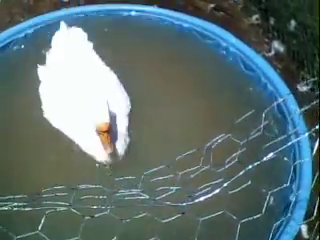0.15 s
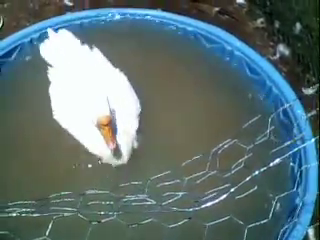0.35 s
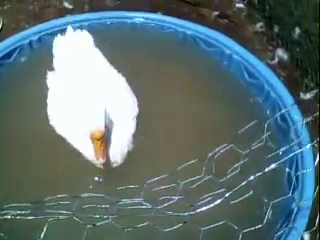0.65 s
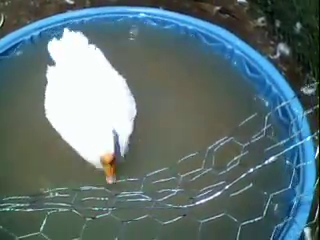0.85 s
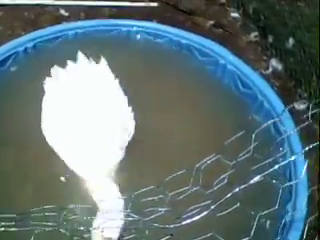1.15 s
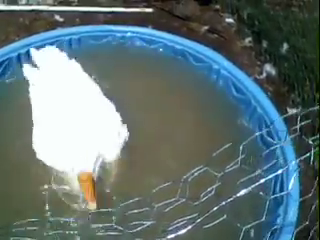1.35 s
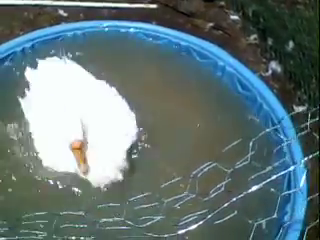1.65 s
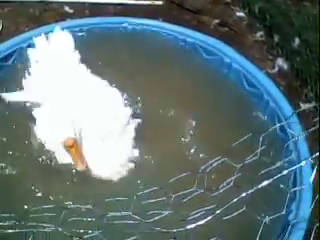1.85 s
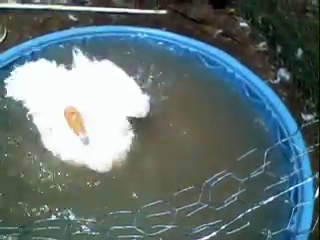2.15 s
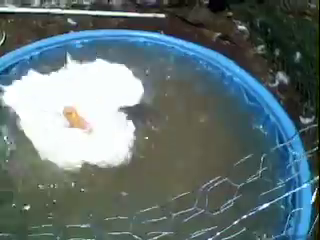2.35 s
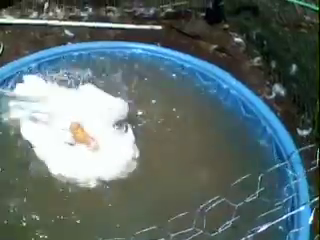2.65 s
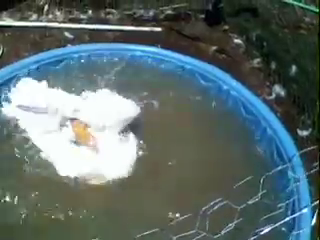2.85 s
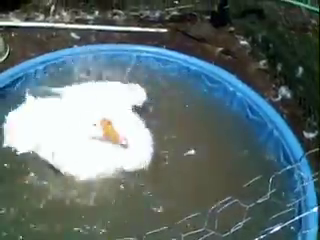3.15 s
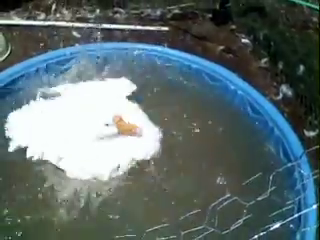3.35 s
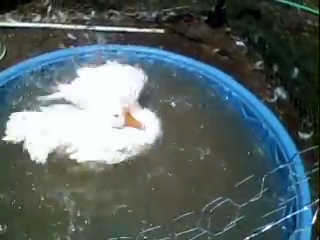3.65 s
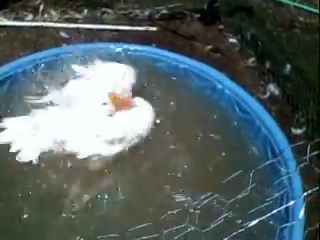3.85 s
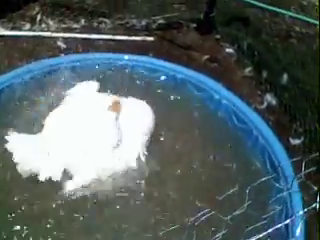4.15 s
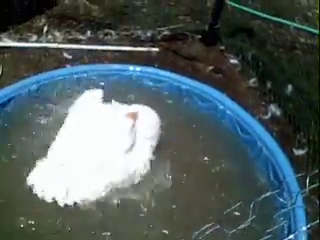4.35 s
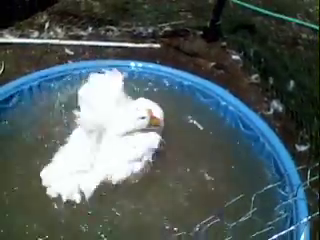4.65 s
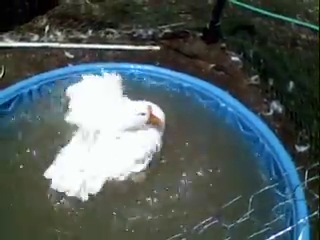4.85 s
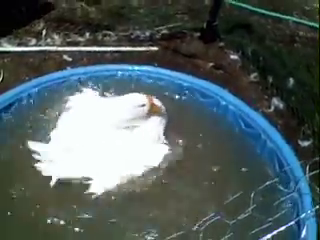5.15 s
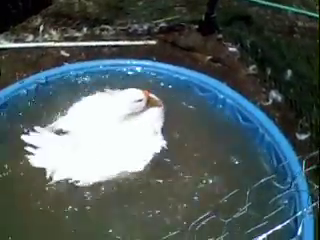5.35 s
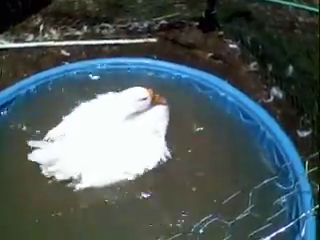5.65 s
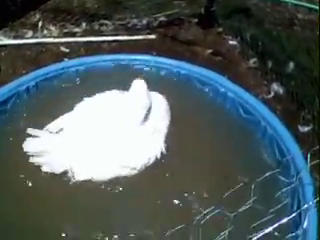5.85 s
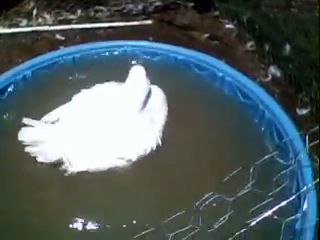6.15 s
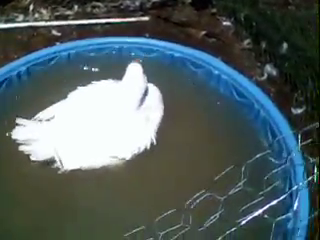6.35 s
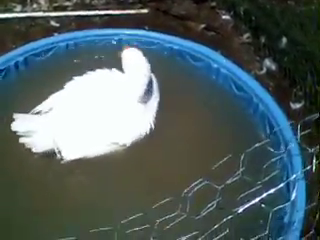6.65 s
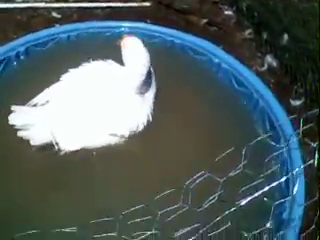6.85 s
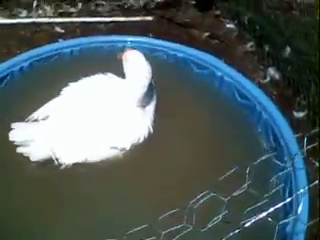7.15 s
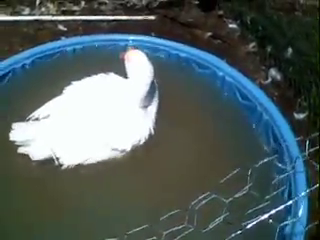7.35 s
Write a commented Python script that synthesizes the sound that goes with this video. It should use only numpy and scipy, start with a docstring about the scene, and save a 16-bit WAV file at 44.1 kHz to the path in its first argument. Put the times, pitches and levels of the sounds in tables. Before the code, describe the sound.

Wind buffets the microphone while a bathing goose churns water in rhythmic splashes, with gloops, spray and drips.

```python
"""First you hear gusts rumbling on a small camera's microphone, over a soft breeze, hiss and a thin whine.
A goose rasps its bill along wire netting and knocks the wall of a shallow plastic pool. Then it rolls
and beats its wings in the water: slaps, spray, falling drops and churning, made mostly of tiny ringing
bubbles. Bigger pockets of trapped air gloop upward in pitch. The camera's case colours the splashes."""
import sys
import numpy as np
from scipy import signal
from scipy.fft import rfft, irfft
from scipy.io import wavfile
from scipy.ndimage import map_coordinates

SR = 44100
rng = np.random.default_rng(int(sys.argv[2]) if len(sys.argv) > 2 else 0)


def file_out(sig):
    """Save sig as 16-bit WAV at sys.argv[1]."""
    # one column per channel
    cols = np.atleast_2d(sig).T
    # limit, then scale
    lim = np.clip(cols, -1, 1)
    pcm = np.round(lim * 32767).astype(np.int16)
    wavfile.write(sys.argv[1], SR, pcm)


N = 331014
TIME = np.arange(N) / SR


def amp(db):
    """Turn decibels into a number to multiply by."""
    return 10 ** (np.asarray(db) / 20)


def unit(x):
    """Scale a signal so that its average power is 1."""
    return x / np.sqrt(np.mean(x ** 2) + 1e-20)


def level_curve(rows, outside_db=None):
    """Join (t/s, level/dB) points into a volume curve."""
    times, db = np.transpose(rows)
    return amp(np.interp(TIME, times, db, outside_db, outside_db))


def swell(t, rise_s, fall_s):
    """A shape that grows to 1 at t = 0, then dies away."""
    return np.exp(np.minimum(t / rise_s, -t / fall_s))


def wander(per_s):
    """A smooth random wiggle, about 1 in size, that changes per_s times a second."""
    points = rng.standard_normal(4000)
    return unit(map_coordinates(points, [TIME * per_s], order=2, mode="wrap"))


def colour(x, tone):
    """Shape the lows and highs by (f/Hz, level/dB) points, falling 18 dB an octave above the last."""
    size = 16384
    hz, db = np.transpose(tone)
    grid = np.maximum(np.fft.rfftfreq(size, 1 / SR), 1)
    level = np.interp(np.log(grid), np.log(hz), db) - 18 * np.maximum(np.log2(grid / hz[-1]), 0)
    # build the filter so that it never rings ahead of a sound (minimum phase)
    cepstrum = irfft(np.log(amp(level)))[:size // 2]
    cepstrum[1:] *= 2
    response = irfft(np.exp(rfft(cepstrum, size)))
    return signal.fftconvolve(x, response)[:N]


def noise(tone):
    """A steady rushing sound with the given lows and highs."""
    return unit(colour(rng.standard_normal(N), tone))


def ring(clicks, hz, ring_s):
    """Each click starts a note that fades by 60 dB in ring_s."""
    keep, turn = amp(-60 / (ring_s * SR)), 2 * np.pi * hz / SR
    return signal.lfilter([0, np.sin(turn)], [1, -2 * keep * np.cos(turn), keep * keep], clicks + 1e-18)


def add(track, s, sound):
    """Mix a sound into a track, starting at s seconds."""
    i = max(int(s * SR), 0)
    track[i:i + len(sound)] += sound[:N - i]


def pool_echo(x, ring_s, echo_db):
    """Sound bounces off the pool wall and the ground and follows close behind."""
    t = TIME[:SR // 6]
    tail = rng.standard_normal(len(t)) * amp(-60 * t / ring_s) * (t > .002)
    return x + amp(echo_db) * signal.fftconvolve(x, tail / np.linalg.norm(tail))[:N]


# pitches that the camera's case boosts or dulls: f/Hz, width/Hz, gain/dB
CASE_BANDS = [(893, 290, 8.5), (1157, 57, -5.5), (1326, 170, 8), (1660, 220, -9), (1910, 720, 19.5),
              (2610, 268, -19), (3004, 220, 5.5), (3900, 1080, 13), (5527, 540, 9), (7830, 660, -10),
              (9200, 1040, 12.5)]

def camera_case(x):
    """The small hollow in front of the microphone makes some pitches louder and others softer."""
    for hz, width, db in CASE_BANDS:
        turn, gain = 2 * np.pi * hz / SR, amp(db / 2)
        band, middle = np.sin(turn) * width / (2 * hz), -2 * np.cos(turn)
        top = [1 + band * gain, middle, 1 - band * gain]
        bottom = [1 + band / gain, middle, 1 - band / gain]
        x = signal.lfilter(top, bottom, x)
    return x


# how the far-off breeze rises and falls: t/s, level/dB
BREEZE_LEVELS = [(0, -55.5), (.5, -67), (5.6, -65.5), (7.5, -72)]
# tone of the breeze and of the hiss: f/Hz, level/dB
BREEZE_TONE = [(150, 4.5), (850, 2), (1400, -7.5)]
HISS_TONE = [(100, -3), (1300, 3), (3000, 1.5), (9500, 2), (11500, -11.5)]
# notes in the whine: f/Hz, level/dB
WHINE_NOTES = [(4199, -92), (5599, -83.5), (6202, -104), (7400, -83), (10524, -91)]

def background(hiss_db=-72.5, waver=0.53):
    """A soft breeze blows further off, while the camera's electronics hiss and whine."""
    breeze = level_curve(BREEZE_LEVELS) * noise(BREEZE_TONE)
    whine = sum(amp(db) * np.sqrt(2) * np.sin(2 * np.pi * hz * TIME + waver * wander(39))
                for hz, db in WHINE_NOTES)
    return breeze + amp(hiss_db) * noise(HISS_TONE) + whine


# strength of the wind on the microphone: t/s, level/dB
WIND_LEVELS = [(0.0, -54), (0.3, -48), (0.5, -43), (0.74, -52), (0.9, -38.5), (1.28, -56.5), (1.4, -55.5),
               (1.99, -54.5), (2.3, -48.5), (2.75, -49.5), (3.32, -54.5), (3.51, -42.5), (3.75, -41.5),
               (4.18, -52.5), (4.65, -54), (4.88, -49), (5.05, -52.5), (5.54, -54), (5.9, -47.5),
               (6.21, -40), (6.45, -47), (6.7, -45.5), (7.51, -60)]
# tone of the big and the small swirls of air: f/Hz, level/dB
RUMBLE_TONE = [(5, 1.5), (14, 9.5), (30, -5.5), (50, -10), (80, -22.5), (250, -69)]
FLUTTER_TONE = [(25, -14), (60, 3.5), (90, -2.5), (130, -8.5), (300, -20.5), (550, -33.5), (900, -39)]

def wind(rumble_db=0.5, flutter_db=3.0, gustiness_db=1.0, swirl_db=4.0):
    """Big swirls of air rumble on the microphone; small ones flutter at its opening as gusts grow."""
    gust = level_curve(WIND_LEVELS) * amp(gustiness_db * wander(per_s=15))
    rumble = noise(RUMBLE_TONE)
    flutter = unit(noise(FLUTTER_TONE) * amp(swirl_db * wander(per_s=45)))
    return amp(rumble_db) * gust ** 0.65 * rumble + amp(flutter_db) * gust * flutter


# sudden puffs of air: t/s, push level/dB, swirl level/dB, swirl fade/s
AIR_PUFFS = [(0.436, -21, -67, 0.08), (0.87, -22, -44, 0.13), (1.182, -23, -41, 0.022),
             (2.312, -17.5, -40.5, 0.035), (3.131, -33, -38.5, 0.089), (3.5, -23.5, -46, 0.14),
             (5.215, -17, -43, 0.082), (5.677, -51, -45, 0.033), (6.226, -25, -35, 0.046),
             (6.701, -31, -47.5, 0.04), (7.21, -32, -43.5, 0.026)]
# tone of the swirling air behind a puff: f/Hz, level/dB
SWIRL_TONE = [(40, 2.5), (110, 15), (300, -2), (700, -11.5), (1500, -41)]

def puffs(push_s=0.0079, rise_s=0.012):
    """A puff gives the microphone one push and trails swirling air behind it."""
    pushes, swirls = 0, 0
    for s, push_db, swirl_db, fade_s in AIR_PUFFS:
        t = TIME - s
        pushes += amp(push_db) * np.exp(-(t / push_s) ** 2)
        swirls += amp(swirl_db) * swell(t, rise_s, fade_s)
    return pushes + swirls * noise(SWIRL_TONE)


# faint dry ticks before and after the bath: t/s, level/dB
DRY_TICKS = [(0.135, -49), (.529, -39.5), (5.753, -46), (6.126, -46), (6.415, -49)]

def ticks(fade_s=0.00025):
    """Each tick is one sharp jump in air pressure that leaks away at once."""
    out = np.zeros(N)
    for s, db in DRY_TICKS:
        add(out, s, amp(db) * np.exp(-TIME[:SR // 100] / fade_s))
    return out


# the biggest falling drops: t/s, f/Hz, level/dB
BIG_DROPS = [(.256, 5950, -55.5), (1.322, 6700, -55), (1.482, 6660, -54.5), (1.533, 5770, -57),
             (1.726, 4110, -58), (1.89, 5360, -53.5), (2.746, 5300, -50), (3.165, 5360, -34.5),
             (3.247, 5400, -50), (3.377, 5300, -38), (3.492, 3900, -47), (3.649, 4250, -45.5),
             (3.956, 3860, -54), (4.083, 3890, -54.5), (4.927, 4100, -50.5), (5.193, 3600, -58),
             (5.194, 9200, -55), (5.359, 4060, -57), (5.585, 9370, -48.5)]

def drops(rise_s=0.00039, fade_s=0.00042, tick_share=0.64):
    """A drop ticks on the water and leaves one tiny ringing bubble."""
    out, t = np.zeros(N), TIME[:SR // 25] - TIME[SR // 100]
    for s, hz, db in BIG_DROPS:
        plink = np.sin(2 * np.pi * hz * t) + tick_share * rng.standard_normal(len(t))
        add(out, s + t[0], amp(db) * plink * swell(t, rise_s, fade_s))
    return out


# wings and water landing flat on the pool: t/s, level/dB, fade/s
WATER_SLAPS = [(1.414, -57, 0.0092), (1.689, -50.5, 0.0054), (2.042, -44.5, 0.0057), (2.315, -51, 0.03),
               (2.549, -53.5, 0.009), (3.169, -35.5, 0.0023), (3.378, -34, 0.0053), (3.532, -46.5, 0.05),
               (4.358, -53, 0.02), (4.75, -46.5, 0.0035), (5.179, -51.5, 0.0093)]
# tone of a slap's crackle (also of the bill's scrape) and of its whump: f/Hz, level/dB
CRACKLE_TONE = [(100, 11), (400, 6.5), (1000, -1), (3000, -19), (6000, -13.5), (12000, -32)]
WHUMP_TONE = [(120, -34), (300, 3.5), (550, -2.5), (1200, -42)]

def slaps(rise_s=0.0034, whump_db=-11, whump_s=0.01):
    """A flat blow on water crackles, then gives a dull whump as the dent in the water closes."""
    burst, closing = np.zeros(N), np.zeros(N)
    t = TIME[:SR // 4] - TIME[SR // 50]
    age = np.maximum(t, 0) / whump_s
    for s, db, fade_s in WATER_SLAPS:
        add(burst, s + t[0], amp(db) * swell(t, rise_s, fade_s))
        add(closing, s + t[0], amp(db + whump_db) * age * np.exp(1 - age))
    return burst * noise(CRACKLE_TONE) + closing * noise(WHUMP_TONE)


def bill_pressure(start_s=1.164, hold_s=0.035, rise_s=0.0013, fade_s=0.007, judder_hz=75):
    """The bill bites on the wire, judders and lets go."""
    t = TIME - start_s
    bite = np.clip(t / rise_s, 0, 1)
    judder = 1 + 0.3 * np.sin(2 * np.pi * judder_hz * t)
    release = np.exp(-np.maximum(t - hold_s, 0) / fade_s)
    return bite * judder * release


# notes of the wire netting: f/Hz, level/dB, ring time/s
WIRE_NOTES = [(3000, 2.5, 0.012), (3780, 0, 0.063), (3860, 5, 0.032), (4870, 2, 0.008), (6800, -7, 0.031),
              (9200, -25, .015)]

def bill_rasp(level_db=-49.5, slips_per_s=5000, grit=0.84):
    """The bill slips along the wire in tiny jerks, which keep it ringing over a gritty scrape."""
    slips = rng.standard_normal(N) * (rng.random(N) < slips_per_s / SR)
    wire = unit(sum(amp(db) * ring(slips, hz, ring_s) for hz, db, ring_s in WIRE_NOTES))
    scrape = grit * unit(camera_case(colour(slips, CRACKLE_TONE)))
    return amp(level_db) * (wire + scrape) * bill_pressure()


# knocks of the bill: t/s, level/dB, push time/s (half of the whole touch)
BILL_KNOCKS = [(1.165, -39, 0.00013), (1.201, -28, 0.00028), (1.2262, -35.5, 0.00033)]
# notes of the pool wall: f/Hz, level/dB, ring time/s
WALL_NOTES = [(526, -0.5, 0.035), (790, 1.5, 0.018), (950, -7, 0.023), (1330, -3, 0.034), (1940, 5, 0.0085),
              (1900, -14, 0.059), (3740, -6, .012)]

def bill_knocks():
    """Soft knocks of the bill set the plastic wall thudding."""
    blows = np.zeros(N)
    for s, db, push_s in BILL_KNOCKS:
        push = np.hanning(int(2 * push_s * SR) + 3)
        add(blows, s, amp(db) * push / push.sum())
    wall = sum((-1) ** k * amp(db) * ring(blows, hz, ring_s)  # every other note starts the opposite way
               for k, (hz, db, ring_s) in enumerate(WALL_NOTES))
    return pool_echo(wall, ring_s=0.37, echo_db=-14)


def small_gloops(offset_db=-4.5, spread_db=7.0, low_hz=560, high_hz=1700, fade_s=0.049, climb=11000):
    """Pick 14 small air pockets at random, louder where the bath is livelier; rows as in BIG_GLOOPS."""
    times, effort_db = np.transpose(BATH_EFFORT)
    when, pitch, softness = rng.random((14, 3)).T
    starts = times[0] + (times[-1] - times[0]) * when
    pitches = low_hz * (high_hz / low_hz) ** pitch
    levels = np.interp(starts, times, effort_db) + offset_db - spread_db * (2 * softness - 1)
    return [(s, hz, db, fade_s, climb) for s, hz, db in zip(starts, pitches, levels)]


# the biggest air pockets closing: t/s, starting f/Hz, level/dB, fade/s, climb/(Hz per s)
BIG_GLOOPS = [(1.43, 693, -53, 0.025, 5000), (1.48, 948, -55, 0.023, 7000),
              (1.725, 1950, -58.5, 0.013, 5000), (1.958, 716, -49, 0.033, 17000),
              (2.217, 973, -49, 0.023, 26600), (2.225, 668, -47.5, 0.033, 8900),
              (2.512, 856, -52, 0.014, 8000), (2.635, 745, -47, 0.015, 16100),
              (2.662, 800, -47.5, 0.013, 3000), (2.872, 583, -48, 0.024, 10000),
              (2.937, 860, -50.5, 0.021, 5000), (2.96, 1203, -51.5, 0.019, 18000),
              (3.038, 946, -48.5, 0.021, 7000), (3.119, 472, -45.5, 0.018, 26000),
              (3.275, 1270, -54, 0.022, 6000), (3.311, 438, -38.5, 0.013, 54000),
              (3.967, 642, -40, 0.015, 20100), (4.005, 1230, -51.5, 0.014, 7000),
              (4.324, 865, -53, 0.024, 5000), (4.654, 1900, -53.5, 0.0091, 5000),
              (4.86, 697, -48, 0.029, 16100), (5.093, 417, -48, 0.02, 20100),
              (5.114, 1124, -48, 0.026, 16000), (5.117, 1730, -52.5, 0.014, 8000),
              (5.153, 529, -46.5, 0.038, 30200), (5.273, 818, -49.5, 0.02, 4000),
              (5.291, 472, -46.5, 0.034, 8050)]

def gloops(level_db=-2.5, rise_s=0.00088, fade_db=17, wobble=0.062, roughness=0.49):
    """A trapped pocket of air rings, wobbles and climbs in pitch as it nears the surface."""
    out, t = np.zeros(N), TIME[:SR // 8]
    pitch_wobble = 1 + wobble * wander(per_s=450)
    level_wobble = 1 + roughness * wander(per_s=550)
    for s, start_hz, db, fade_s, climb in list(BIG_GLOOPS) + small_gloops():
        now = int(s * SR) + np.arange(len(t))
        hz = (start_hz + climb * np.minimum(t, 2 * fade_s)) * pitch_wobble[now]
        volume = (1 - np.exp(-t / rise_s)) * amp(db - fade_db * (t / fade_s) ** 2) * level_wobble[now]
        add(out, s, volume * np.sin(2 * np.pi * np.cumsum(hz) / SR))
    return amp(level_db) * out


def bubbles(per_s, low_hz, high_hz, cycles, spread_db, clump_db, pitches=24):
    """Bubbles pop up in clumps and ring briefly at random pitches; more means denser, not louder."""
    size = amp(spread_db * np.minimum(rng.exponential(1, N), 4)) * rng.choice([-1, 1], N)
    born = rng.random(N) < per_s * amp(clump_db * wander(per_s=60)) / SR
    clicks = size / np.sqrt(per_s) * born
    choice = rng.integers(0, pitches, N)
    return sum(ring(clicks * (choice == k), hz, cycles / hz) * np.sqrt(hz / low_hz)
               for k, hz in enumerate(np.geomspace(low_hz, high_hz, pitches)))


# spurts flung off the feathers: t/s, level/dB, fade/s
FEATHER_SPURTS = [(1.42, -59.5, 0.016), (1.535, -56, 0.0054), (1.597, -58, 0.018), (1.655, -62, 0.025),
                  (1.892, -62, 0.0087), (2.635, -60, 0.0077), (2.748, -58, 0.0097), (3.245, -69, .01),
                  (3.975, -54, 0.028), (4.368, -51.5, 0.013)]
# tone of all the spray: f/Hz, level/dB
SPRAY_TONE = [(1200, 7), (2500, 12.5), (3300, 9), (6500, 15.5), (10000, 8.5), (12000, -34)]

def spurts(rise_s=0.004):
    """A flick of the feathers sends a tight shower of droplets onto the water."""
    shower = sum(amp(db) * swell(TIME - s, rise_s, fade_s) for s, db, fade_s in FEATHER_SPURTS)
    patter = bubbles(per_s=3500, low_hz=2670, high_hz=11300, cycles=12, spread_db=3.0, clump_db=-3.0)
    return shower * unit(camera_case(colour(patter, SPRAY_TONE)))


def surges(rows, rise_s=0.008, fall_s=0.04):
    """Water wells up quickly toward each given time and settles slowly after it."""
    out, t = np.zeros(N), TIME[:SR // 2] - TIME[SR // 8]
    for s, share in rows:
        add(out, s + t[0], share * swell(t, rise_s, fall_s))
    return out


# the bath builds up, peaks and dies away: t/s, level/dB
BATH_EFFORT = [(1.299, -71), (1.66, -64.5), (1.92, -61.5), (2.45, -60), (3.02, -59), (3.26, -54),
               (4.12, -54), (4.461, -60), (4.59, -58), (5.06, -60), (5.18, -60), (5.48, -65), (5.6, -70)]
# wing beats, about five a second: t/s, extra effort (1 doubles it)
WING_BEATS = [(2.33, 0.44), (2.55, 0.38), (2.75, .9), (2.945, 0.51), (3.17, 0.95), (3.565, 0.64),
              (3.765, 1.3), (3.965, 0.79), (4.125, 0.52), (4.365, 0.65), (4.56, 0.74), (4.755, 0.48),
              (4.965, 1.75), (5.175, 0.99)]

def splashing_effort(offset_db=-2.0, gloop_share=0.25, slosh_db=0.8):
    """How hard the water is stirred: it sloshes at random and surges with wing beats and big gloops."""
    beats = surges(WING_BEATS)
    froth = surges([(s + fade_s, gloop_share) for s, _, _, fade_s, _ in BIG_GLOOPS])
    slosh = amp(offset_db + slosh_db * wander(per_s=25))
    return level_curve(BATH_EFFORT, outside_db=-120) * slosh * (1 + beats + froth)


# tone of churned water: f/Hz, level/dB
CHURN_TONE = [(100, -12.5), (250, 1.5), (450, 7.5), (1000, 3), (2200, -6), (3000, -3.5), (6000, -33)]

def bathing(churn_db=2.0, spray_db=-15.0, full_effort_db=-54, trickle_db=-69, trickle_s=0.45):
    """The body churns up big bubbles, the feathers tiny ones: plinks when gentle, a fizz when hard."""
    effort = splashing_effort()
    crowding = np.maximum(effort / amp(full_effort_db), .25)
    churn = bubbles(1900 * crowding, low_hz=232, high_hz=2654, cycles=18.7, spread_db=3.0, clump_db=4.0)
    spray = bubbles(2700 * crowding, low_hz=2235, high_hz=11350, cycles=10, spread_db=4.4, clump_db=3.2)
    churn = pool_echo(churn, ring_s=0.16, echo_db=-19.0)
    spray = pool_echo(spray, ring_s=0.008, echo_db=-4.5)
    churn = unit(camera_case(colour(churn, CHURN_TONE)))
    spray = unit(camera_case(colour(spray, SPRAY_TONE)))
    trickle = amp(trickle_db) * np.exp(-(TIME / trickle_s) ** 2)  # water runs off the neck at first
    spray_volume = amp(spray_db) * effort ** 0.81 + trickle
    return amp(churn_db) * effort * churn + spray_volume * spray


def scene():
    """Everything adds up at the one microphone."""
    splashes = camera_case(pool_echo(gloops() + slaps() + drops(), ring_s=0.13, echo_db=-21.0))
    goose = bathing() + spurts() + splashes + bill_rasp() + bill_knocks()
    return (goose + ticks() + wind() + puffs() + background())[None]


def record(dry):
    """The camera sharply cuts off the highest sounds, above 11500 Hz."""
    return signal.sosfilt(signal.ellip(10, .1, 80, 11500, fs=SR, output="sos"), dry)


dry = scene()
out = record(dry)
file_out(out)
```